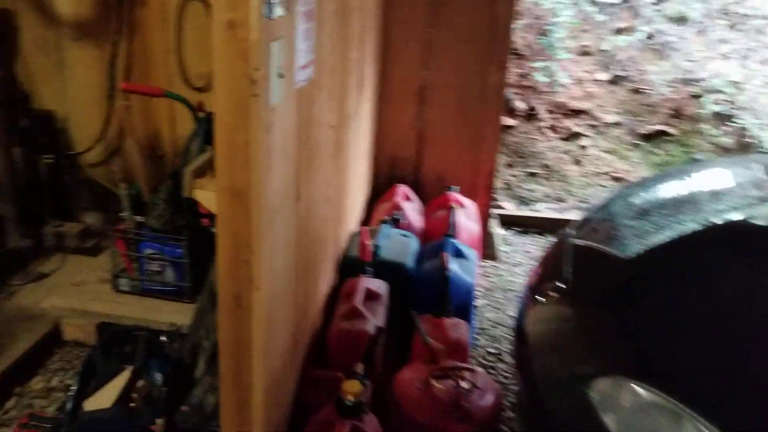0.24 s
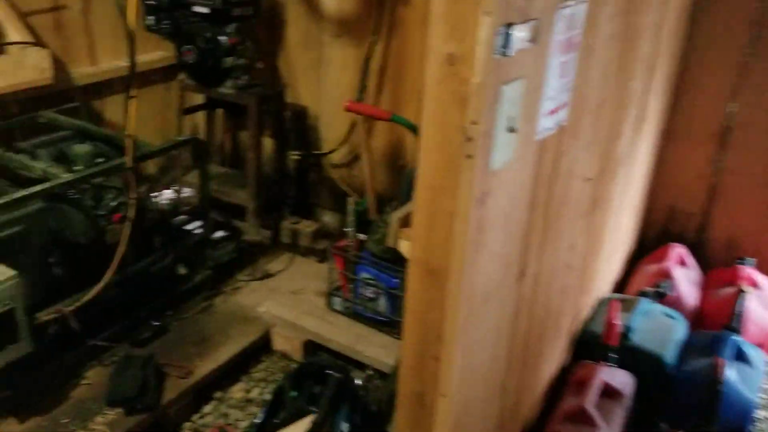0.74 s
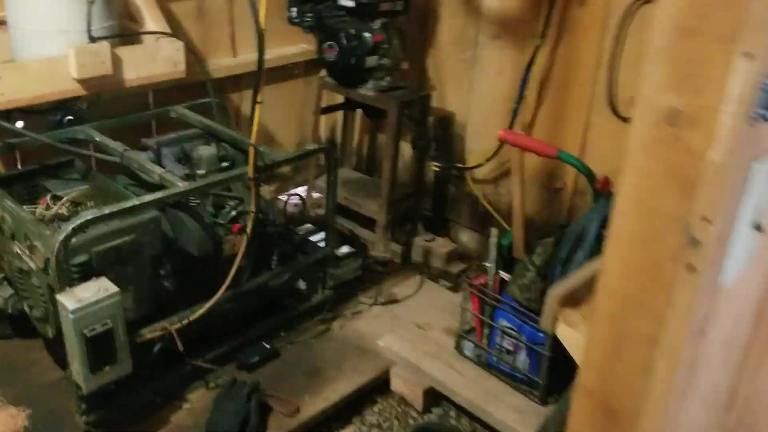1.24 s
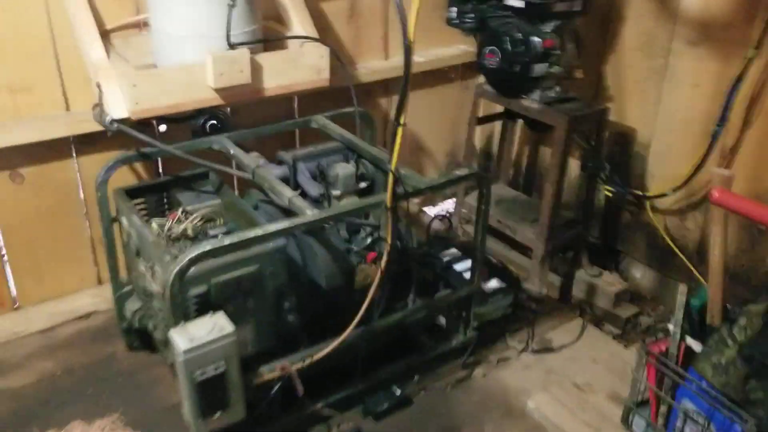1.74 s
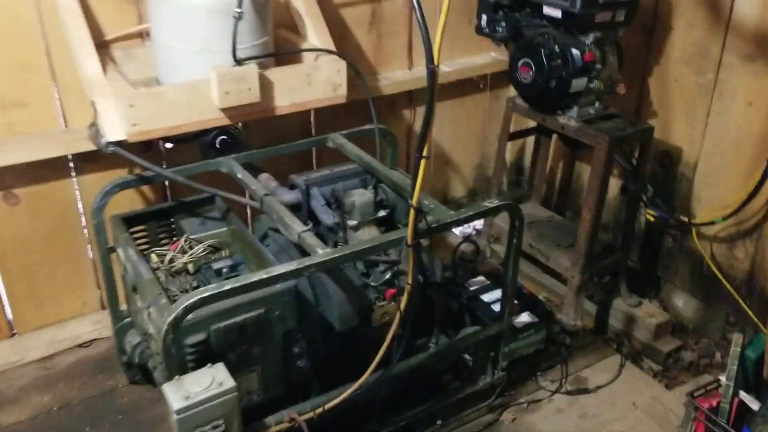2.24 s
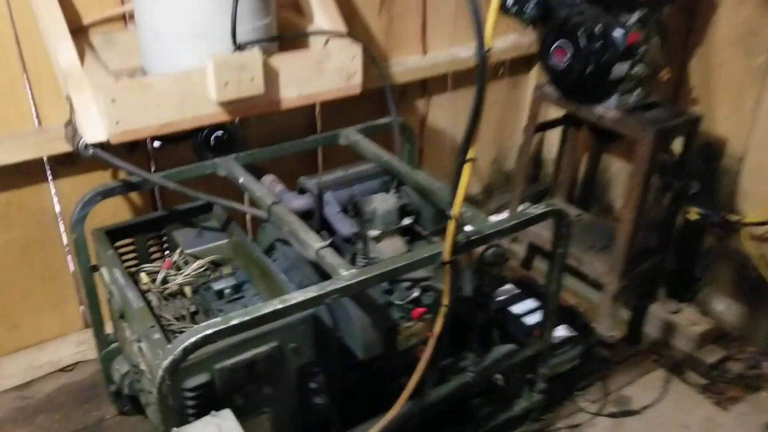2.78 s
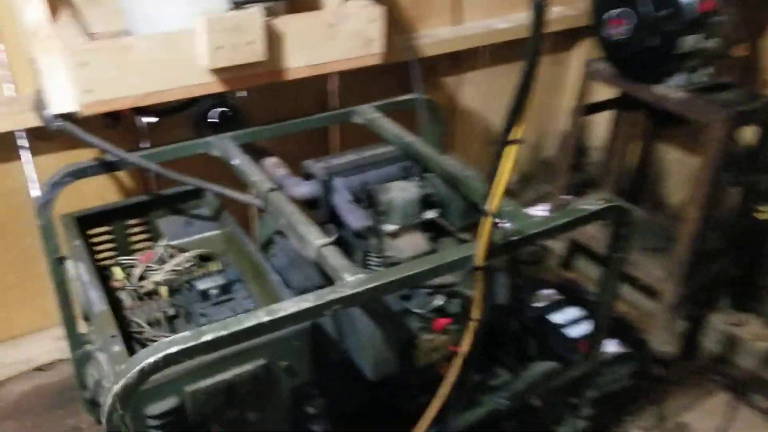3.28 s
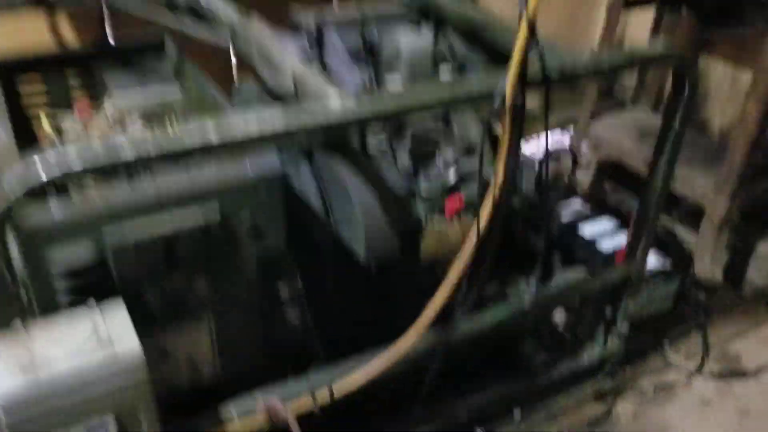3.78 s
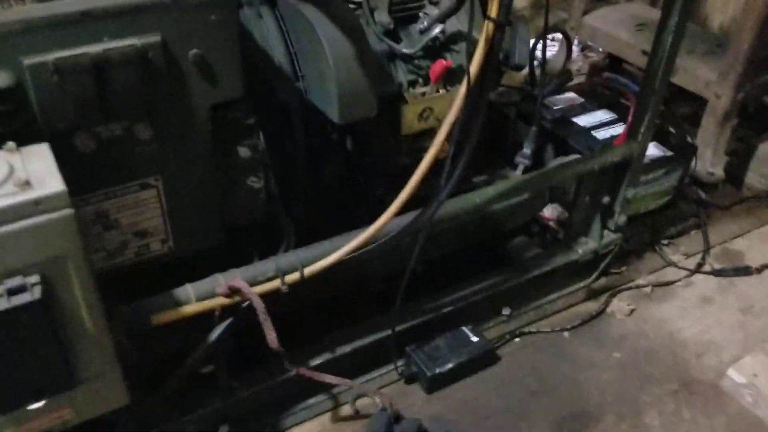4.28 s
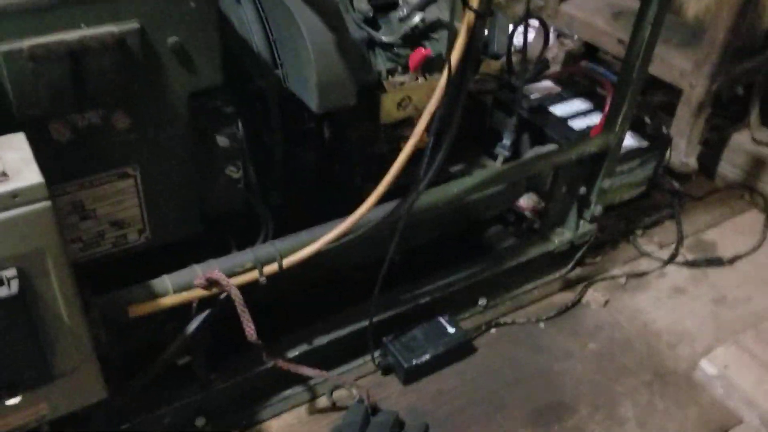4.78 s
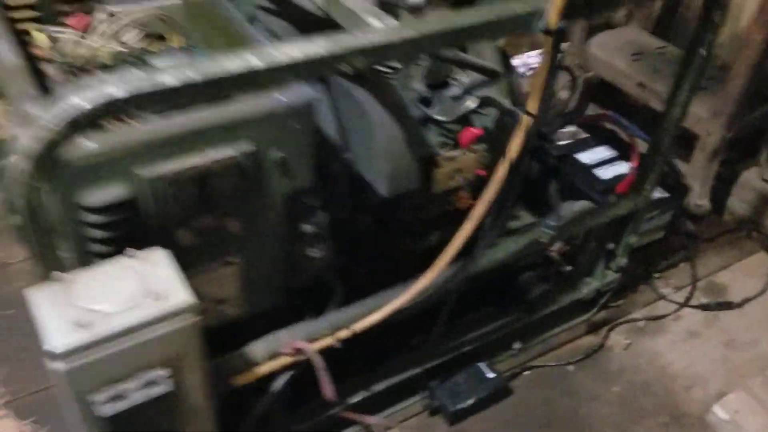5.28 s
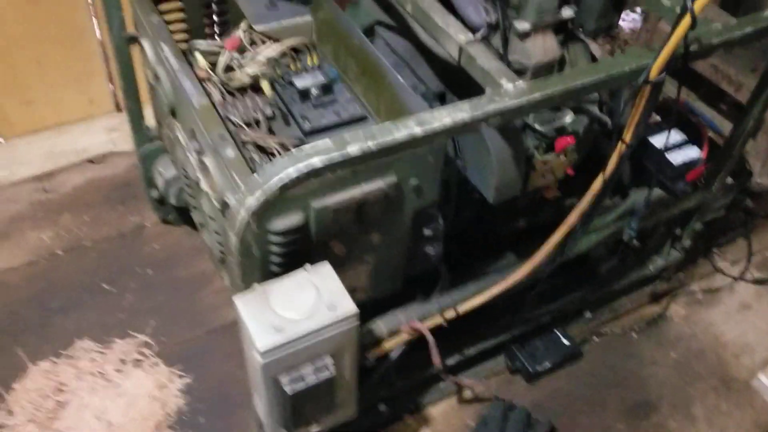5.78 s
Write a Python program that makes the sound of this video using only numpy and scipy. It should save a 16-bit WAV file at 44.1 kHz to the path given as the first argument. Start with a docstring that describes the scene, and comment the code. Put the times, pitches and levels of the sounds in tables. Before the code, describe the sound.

A diesel generator runs loudly in a wooden shed for the whole six seconds or so, never changing speed. A low, steady exhaust drone sits under rapid, even knocking, chattering valves and the ring of the metal frame and panels. Cooling air hisses over a soft rumble, with a faint gear whine. At the start the microphone is at the doorway and the clatter is slightly subdued; it opens up at about 1.5 seconds and eases a little by 2.5. From about 2.5 to 4.5 seconds the microphone moves in low beside the machine: the drone shifts in tone and the knocking becomes harder and brighter. From about 5.2 seconds it rises over the generator, and the metallic clatter grows louder and sharper and swings to the left, while the drone carries on to the end.

```python
"""In a wooden shed, a diesel generator runs governed near 1800 rpm; the microphone is carried from the doorway
to low beside its frame, then rises over it. Exhaust pulses, summed as crank orders, drone in standing waves.
Knocks come round on every turn and ring the frame and block as dense echoes; a sheet-metal cover, a side panel
and the cylinder head sing as decaying modes. Valve gear rattles in noise bursts, timing gears whine as sines,
cooling air hisses as filtered noise over a soft rumble."""
import sys
import numpy as np
from scipy import signal
from scipy.fft import rfft, irfft, next_fast_len
from scipy.io import wavfile
from scipy.ndimage import map_coordinates

SR = 44100
rng = np.random.default_rng(int(sys.argv[2]) if len(sys.argv) > 2 else 0)


def transcribe(u):
    """Save the signal u as a 16-bit wav file named by the first command-line argument.

    u: samples, shape (n,) or (channels, n), limited to [-1, 1]; the rate is SR.
    q: integer samples, one column per channel.
    """
    v = np.clip(np.atleast_2d(u).T, -1, 1)
    q = np.round(v * 32767).astype(np.int16)
    wavfile.write(sys.argv[1], SR, q)


N = 265482
TIME = np.arange(N) / SR  # seconds
CRANK_HZ = 29.965  # turns per second
BAND_LIMIT_HZ = 15750

# The walk: time_s, place (0 at the doorway, 1 low beside the frame)
WALK = [(0, 0.061), (1.35, 0.21), (3.3, 0.58), (3.9, 0.87), (4.4, 1), (4.8, 0.97), (5.2, 0.877), (5.7, 0.7)]
# Between these two places the machine's own near field takes over from the shed
NEAR_FROM, NEAR_TO = 0.39, 0.94
# At the end the microphone rises over the frame
RISE_AT_S, RISE_TAKES_S = 5.23, 0.56
# Balance of the machine, left minus right: before the rise, and what the rise adds to swing it left
PAN_DB, PAN_ABOVE_DB = -0.2, 5.5
# How openly the machine is heard past the door post and its own frame; only departures from
# the mean count: time_s, level_db
OPENNESS = [(0.0, -44.5), (1.41, -33.5), (2.58, -39), (3.6, -37), (4.04, -39), (5.48, -37), (6.02, -40)]

# Exhaust drone and its standing wave: crank_order, far_db, near_db, node_place,
# node_spacing (in places), reflected_share (0-1)
DRONE = [(1, -50, -50, 0.1, 1.2, 0.05), (2, -27, -26, 0.07, 0.8, 0.1), (3, -27, -20.5, 0.96, 1.28, 0.65),
         (4, -16, -30, 0.24, 0.63, 0.18), (5, -32.5, -30, 0.55, 0.62, 0.52),
         (6, -31, -33.5, 0.29, 0.67, 0.5), (7, -28, -32, 0.033, 0.372, 0.33),
         (8, -34, -31, 0.12, 0.536, 0.25), (9, -37.5, -41, 0.72, 0.86, 0.64),
         (10, -36.5, -33.5, 0.014, 0.563, 0.61), (11, -39.5, -31.5, 0.73, 1.02, 0.7),
         (12, -33.5, -34, 0.53, 0.53, 0.38), (13, -44.5, -40, 0.048, 0.402, 0.8),
         (14, -41, -37, 0.38, 0.55, 0.76), (18, -59, -38, 0.01, 0.179, 0.36)]
# The shed's lowest resonances, which shift the drone's phases: centre_hz, half_width_hz
SHED_RESONANCES = [(66, 2.9), (140, 4.3), (225, 8.8), (318, 13.3)]

# Blows in each turn (valve seat, combustion, piston slap, injection pump): crank_angle_turns, level_db
KNOCKS = [(.02, -2), (.3, 0), (.54, -1), (.78, -2.5)]
# Ring of the frame: pitch_hz, relative_level_db
FRAME_RING = [(300, -11), (450, -4), (530, 0.5), (600, -4), (780, 1), (900, -4), (1020, -5), (1250, -5.5),
              (2000, -30)]
# Ring of block and shed at the doorway: pitch_hz, relative_level_db
BLOCK_RING_FAR = [(700, -33), (1000, -2.5), (1170, 2.5), (1290, -1.5), (1450, 1.5), (1800, -3.5),
                  (2100, -4.5), (2400, -14.5), (3500, -24), (5000, -38), (8000, -52)]
# The same from beside the frame: pitch_hz, relative_level_db
BLOCK_RING_NEAR = [(700, -45), (1000, -3), (1170, 3), (1400, 9.5), (1550, 10), (1800, 8), (2100, 5),
                   (2500, 0), (3500, -6.5), (5000, -19), (8000, -60)]

# Modes of the sheet-metal cover: pitch_hz, relative_level_db, t60_s
COVER_MODES = [(1079, -2, .17), (1109, 0, .17), (1139, -6, .14)]
# Modes of a side panel: pitch_hz, relative_level_db, t60_s
PANEL_MODES = [(780, -13, .1), (1260, -2, .1), (1289, 0, .14), (1410, -9.5, .08)]
# Modes of the cylinder head: pitch_hz, relative_level_db, t60_s
HEAD_MODES = [(1620, -7, .04), (1785, 0, .025), (1860, 0, .028), (2460, -11, .04)]

# Timing-gear whine: crank_order, level_db (before flutter)
GEARS = [(82, -45), (102, -46), (117, -47.5)]
# Colour of the valve-gear rattle: pitch_hz, relative_level_db
RATTLE_COLOUR = [(300, -20), (600, 1.5), (1200, 5), (1800, 3), (2500, -0.5), (3600, -4.5), (4400, -7),
                 (5200, -15), (6500, -15), (7700, -27), (10000, -25.5)]
# Colour of the cooling air: pitch_hz, relative_level_db
AIR_COLOUR = [(3240, 1), (5500, -9), (6530, -6), (7750, -11.5), (9560, 6.5), (10100, 5.5), (12600, 3),
              (15100, -2), (15700, -6.5)]
# Colour of the fan rumble: pitch_hz, relative_level_db
RUMBLE_COLOUR = [(15, -18), (30, -23), (60, 6.5), (120, 0.5), (250, -3), (400, -4), (700, -13.5),
                 (1500, -40)]

# How loud each part is, one row each: base_db, db_per_db_of_openness, added_near_db, added_above_db
FRAME_LEVEL = (-28, 0.2, 2.9, 1.5)
BLOCK_LEVEL = (-24, 0.37, -0.5, 3.5)
PANEL_LEVEL = (-31, .7, -3, 0)
HEAD_LEVEL = (-34, 0.8, 1.5, 10)
RATTLE_LEVEL = (-26.5, 0.64, 1.5, 4)
AIR_LEVEL = (-35.5, 1, 2, 1.5)
# Level of the cover's ring before nearness is added: time_s, level_db
COVER_LEVEL = [(0.0, -27.5), (0.42, -22.5), (1.11, -32.5), (3.52, -34), (3.69, -24.5), (4.39, -28.5),
               (5.18, -24), (5.85, -28), (6.02, -49)]

# Likeness of the two ports in a diffuse field: pitch_hz, likeness (-1 opposite, 0 unrelated, 1 same)
PORT_LIKENESS = [(100, -1), (250, 0.1), (500, 0.6), (1000, 0.18), (2000, -0.01), (4000, 0)]
# Balance of the microphone's ports: pitch_hz, left_minus_right_db
PORT_BALANCE = [(60, 2.5), (125, 3), (250, 2.3), (500, 1), (1000, 0), (2000, 0), (4000, 0), (8000, 1.6),
                (12000, 0.7)]


def exhaust(turns, place, near, angle=.52, late_turns=0.122, smear=0.93, waver_db=1.5,
            uneven_db=0.21, upper_db=0.0):
    """One pulse a turn as crank orders; each stands as a wave whose nodes the walk passes through."""
    drone = np.zeros(N)
    for order, far_db, near_db, node, spacing, reflected in DRONE:
        k = round(order)
        # each resonance flips the phase of the orders above it, which spreads the pulse into a drone
        order_hz = k * CRANK_HZ
        lag = sum(np.arctan2(width, centre - order_hz) for centre, width in SHED_RESONANCES) - np.pi / 2
        # shorter waves reach the doorway late, by way of the walls, and drift in phase and level
        echo = np.clip(k / 2 - 2, 0, 1)
        delayed_turns = turns - angle - echo * late_turns * (1 - near)
        phase = 2 * np.pi * k * delayed_turns - lag + echo * smear * wobble(0.658)
        reflection = reflected * np.cos(phase + 2 * np.pi * (place - node) / spacing)
        wave = np.cos(phase) - reflection
        level_db = (1 - near) * far_db + near * near_db
        level_db = level_db + echo * (upper_db + waver_db * wobble(2.014))
        drone += np.sqrt(2) * amp(level_db) * wave
    return drone * amp(uneven_db * wobble(25))  # the whole drone is slightly uneven


def knocking(turns, near, above):
    """The knocks repeat almost exactly, so their ring falls into lines one crank order apart."""
    trains = [blows(turns, [knock], jitter_s=.000035, scatter_db=1) for knock in KNOCKS]
    ring = sum(paths(train, t60=0.038, rise_s=0.0053) for train in trains)
    frame = loudness(FRAME_LEVEL, near, above) * diffuse(ring, FRAME_RING)
    block_far = (1 - near) * diffuse(ring, BLOCK_RING_FAR)
    block_near = near * diffuse(ring, BLOCK_RING_NEAR)
    block = loudness(BLOCK_LEVEL, near, above) * unit(block_far + block_near)
    return frame + block


def blows(turns, knocks, jitter_s, scatter_db):
    """One impulse per knock and turn, each a little off in time and strength."""
    train = np.zeros(N)
    for angle, db in knocks:
        when = np.interp(np.arange(int(turns[-1]) + 1) + angle, turns, TIME)
        late, size = rng.standard_normal((len(when), 2)).T
        at = np.round((when + jitter_s * late) * SR).astype(int)
        inside = (at >= 0) & (when < TIME[-1]) & (at < N)
        strength = amp(db + scatter_db * size)
        train += np.bincount(at[inside], strength[inside], N)
    return train


def paths(train, t60, rise_s, step_s=0.5505, shed_db=-10, shed_t60=0.31):
    """Blows reach both ports over dense random echoes, crossfaded to a fresh set at every step."""
    t = TIME[:SR // 6]
    metal_decay = amp(-60 * t / t60)
    shed_decay = amp(shed_db - 60 * t / shed_t60)
    decay = (metal_decay + shed_decay) * (1 - np.exp(-t / rise_s))
    lead_in = np.pad(train, (len(t), 0), mode="wrap")  # the shed is already ringing
    out = np.zeros((2, N))
    for s in np.arange(0, TIME[-1] + step_s, step_s):
        at = np.flatnonzero(abs(TIME - s) < step_s)
        echoes = rng.standard_normal((2, len(t))) * decay
        span = lead_in[None, at[0]:at[-1] + len(t)]
        heard = signal.fftconvolve(span, echoes, "full", axes=1)
        heard = heard[:, len(t) - 1:][:, :len(at)]
        out[:, at] += np.cos(np.pi / 2 * (TIME[at] - s) / step_s) * heard
    return out


def metalwork(turns, near, above, cover_near_db=1.0):
    """The cover, the side panel and the cylinder head each sing in their own modes, struck once a turn."""
    cover = struck(turns, .5, COVER_MODES, port_phase_rad=1.3, rise_s=.003)
    panel = struck(turns, .36, PANEL_MODES, port_phase_rad=1.3, rise_s=.002)
    head = struck(turns, .26, HEAD_MODES, port_phase_rad=1.5, rise_s=.0015)
    cover_db = curves(COVER_LEVEL)[0] + cover_near_db * near
    return (amp(cover_db) * cover
            + loudness(PANEL_LEVEL, near, above) * panel
            + loudness(HEAD_LEVEL, near, above) * head)


def struck(turns, angle, modes, port_phase_rad, rise_s):
    """Decaying modes hit once a turn, rms 1; the two ports hear them out of step."""
    t = TIME[:SR // 5]
    train = blows(turns, [(angle, 0)], jitter_s=.00004, scatter_db=1)
    port_phase = np.array([[0], [port_phase_rad]])
    ring = sum(amp(db - 60 * t / t60) * np.sin(2 * np.pi * hz * t + port_phase) for hz, db, t60 in modes)
    soft_onset = (1 - np.exp(-t / rise_s)) ** 2
    return unit(signal.oaconvolve(train[None], ring * soft_onset, axes=1)[:, :N])


def rattle(turns, near, above, fade_turns=0.24, steady=1.0, scatter_db=4.5):
    """Valve gear and injectors chatter: steady noise swells unevenly at every knock, then fades."""
    bursts = np.zeros(N)
    for angle, db in KNOCKS:
        fade = np.exp(-((turns - angle) % 1) / fade_turns)
        bursts += amp(db + scatter_db * wobble(30)) * fade
    noise = diffuse(rng.standard_normal((2, N)), RATTLE_COLOUR)
    return loudness(RATTLE_LEVEL, near, above) * unit(steady + bursts) * noise


def gears(turns, flutter_db=3):
    """Meshing teeth whine faintly and unevenly, differently at each port."""
    def port():
        whine = np.zeros(N)
        for order, db in GEARS:
            phase = 2 * np.pi * round(order) * turns + wobble(4)
            whine += amp(db + flutter_db * wobble(4.8)) * np.sin(phase)
        return whine
    return np.array([port(), port()])


def fan(turns, near, above, pulse_db=.5, rumble_db=-31):
    """Cooling air hisses through the fins, pulsing slightly with the crank, over a soft rumble."""
    flow_db = pulse_db * np.cos(2 * np.pi * (turns - .9)) + 0.26 * wobble(12)
    air = diffuse(rng.standard_normal((2, N)), AIR_COLOUR)
    hiss = loudness(AIR_LEVEL, near, above) * amp(flow_db) * air
    rumble = amp(rumble_db) * diffuse(rng.standard_normal((2, N)), RUMBLE_COLOUR)
    return hiss + rumble


def listener():
    """Where the microphone is: place along the walk, nearness 0-1 and height over the frame 0-1."""
    place, = curves(WALK)
    near = ease((place - NEAR_FROM) / (NEAR_TO - NEAR_FROM))
    above = ease((TIME - RISE_AT_S) / RISE_TAKES_S)
    return place, near, above


def loudness(part, near, above):
    """Gain of a part as the view of it opens, the microphone nears it and rises over it."""
    base_db, follows, near_db, above_db = part
    open_db, = curves(OPENNESS)
    return amp(base_db + follows * (open_db - open_db.mean()) + near_db * near + above_db * above)


def diffuse(pair, spectrum):
    """Two signals become a coloured stereo field of rms 1; mid and side shares set the ports' likeness."""
    def shares(hz):
        turn = np.arccos(np.clip(along(PORT_LIKENESS, hz), -1, 1)) / 2
        return amp(along(spectrum, hz)) * [np.cos(turn), np.sin(turn)]
    mid, side = filtered(pair, shares)
    return unit(np.array([mid + side, mid - side]))


def filtered(x, response):
    """x times a response of frequency."""
    size = next_fast_len(N + 8192)
    return irfft(rfft(x, size) * response(np.fft.rfftfreq(size, 1 / SR)), size)[..., :N]


def along(points, hz):
    """(Hz, value) points read on a log frequency axis."""
    f, v = np.transpose(points)
    return np.interp(np.log(hz + 1), np.log(f + 1), v)


def curves(rows):
    """One value per sample for each column after the time."""
    s, *cols = np.transpose(rows)
    return [np.interp(TIME, s, c) for c in cols]


def wobble(rate):
    """A smooth random curve, rate knots a second."""
    return map_coordinates(rng.standard_normal(int(N * rate / SR) + 4), [TIME * rate])


def ease(x):
    """A smooth step from 0 to 1."""
    x = np.clip(x, 0, 1)
    return x * x * (3 - 2 * x)


def amp(db):
    """Decibels to gain."""
    return 10 ** (np.asarray(db) / 20)


def unit(x):
    """Scaled to rms 1."""
    return x / np.sqrt(np.mean(x ** 2) + 1e-20)


def scene():
    """Every source shares one crankshaft, whose governor lets the speed wander very slightly."""
    turns = np.cumsum(CRANK_HZ + .015 * wobble(3)) / SR
    place, near, above = listener()
    pan = amp(np.outer([.5, -.5], PAN_DB + PAN_ABOVE_DB * above))
    machine = knocking(turns, near, above) + metalwork(turns, near, above)
    machine = machine + rattle(turns, near, above) + gears(turns)
    return exhaust(turns, place, near) + pan * machine + fan(turns, near, above)


def record(dry):
    """The left port hears more bass and top treble; tall peaks are rounded and the band is limited."""
    heard = filtered(dry, lambda hz: amp(np.outer([.5, -.5], along(PORT_BALANCE, hz))))
    rounded = heard / (1 + (heard / .95) ** 8) ** (1 / 8)
    return filtered(rounded, lambda hz: hz < BAND_LIMIT_HZ)


dry = scene()
out = record(dry)
transcribe(out)
```